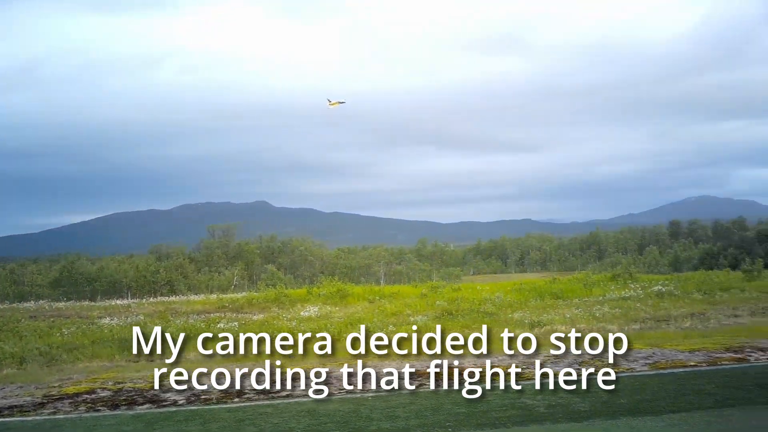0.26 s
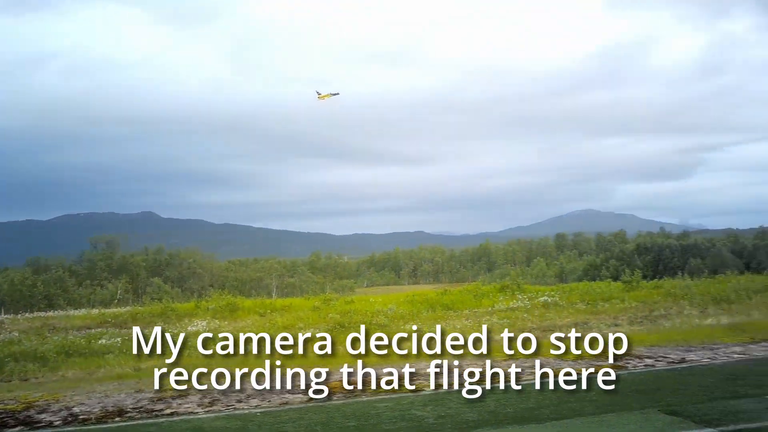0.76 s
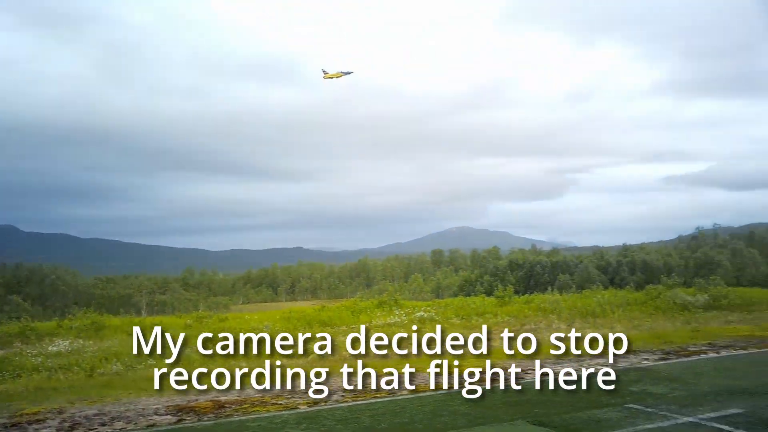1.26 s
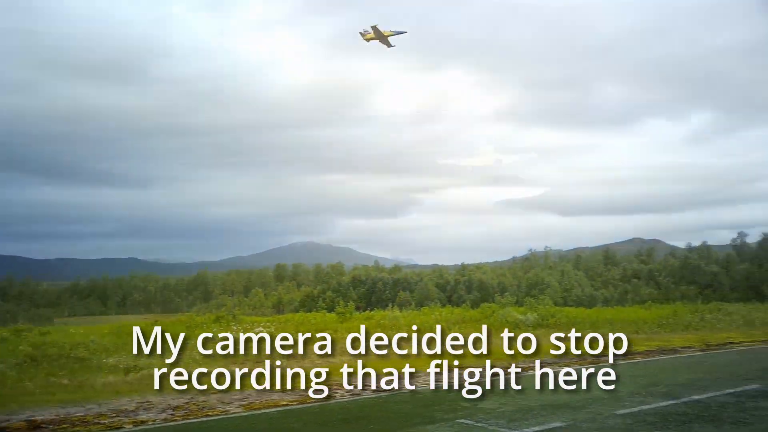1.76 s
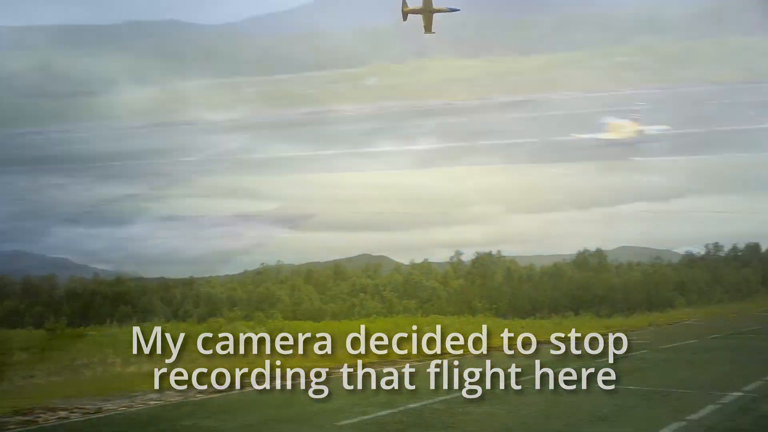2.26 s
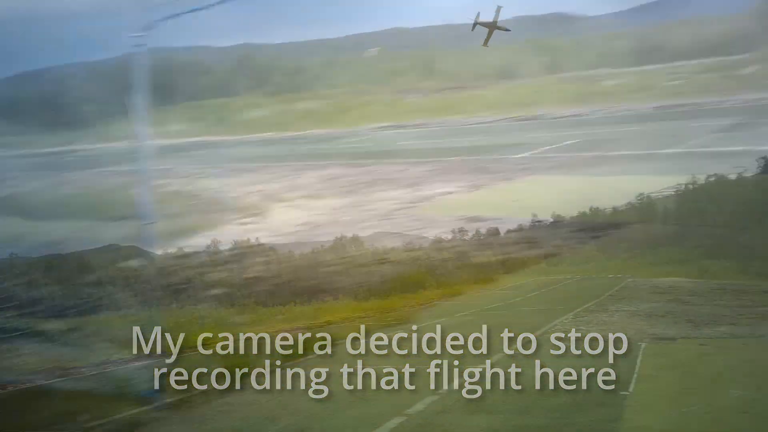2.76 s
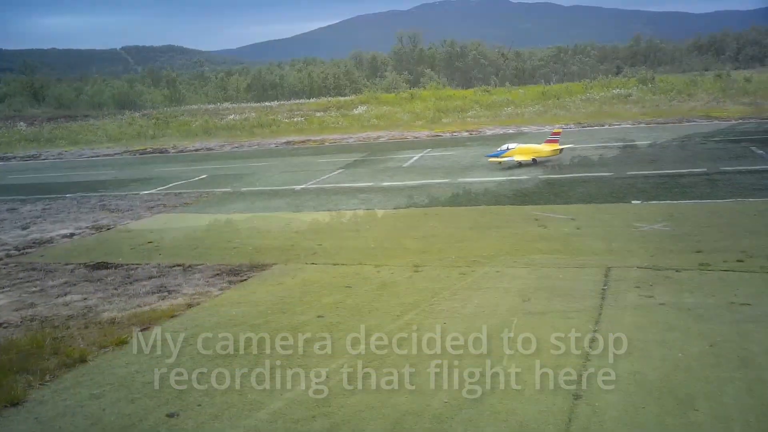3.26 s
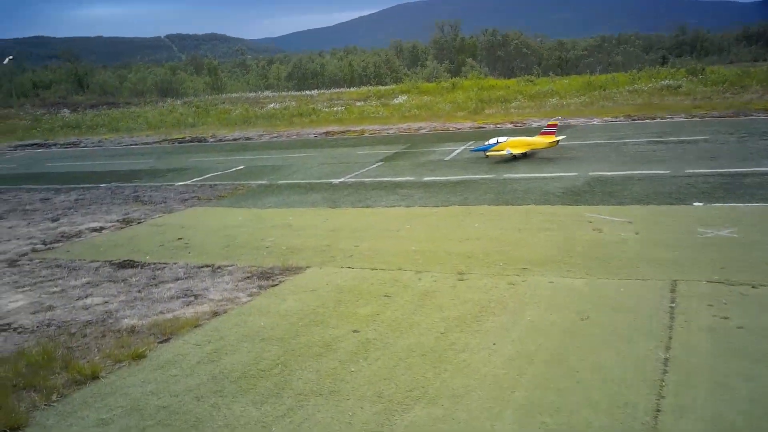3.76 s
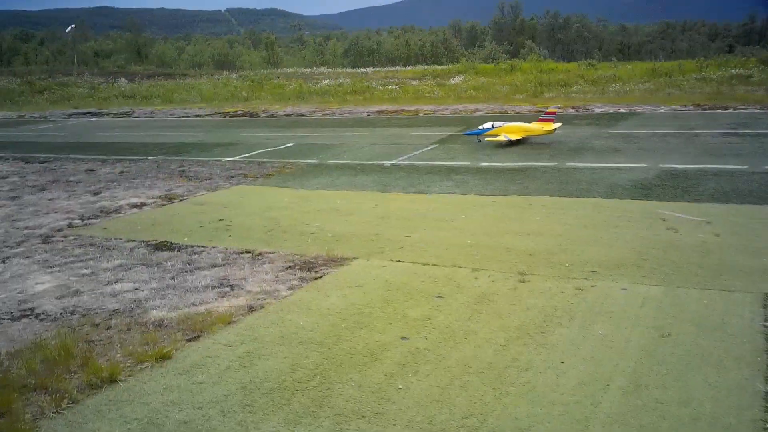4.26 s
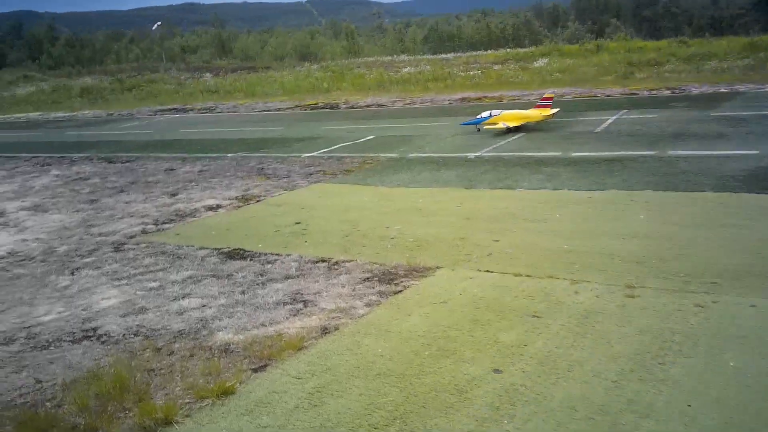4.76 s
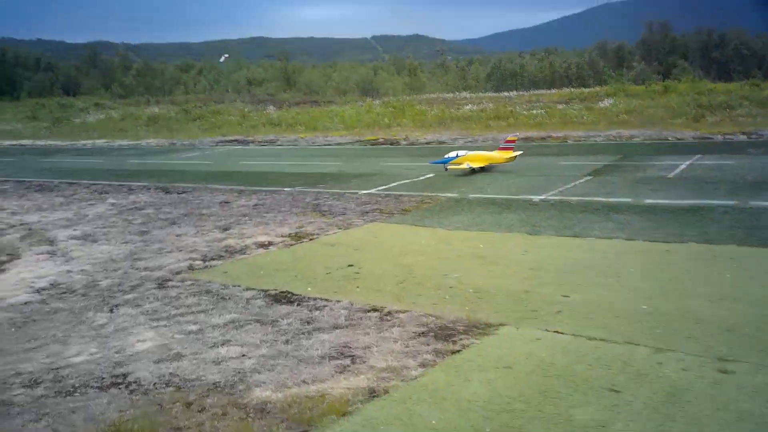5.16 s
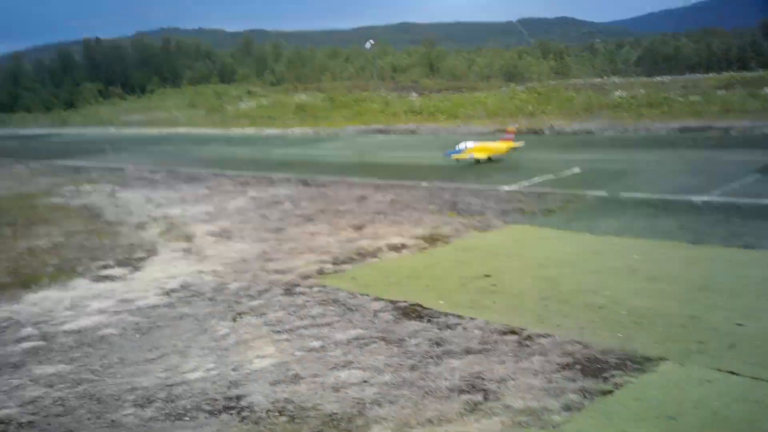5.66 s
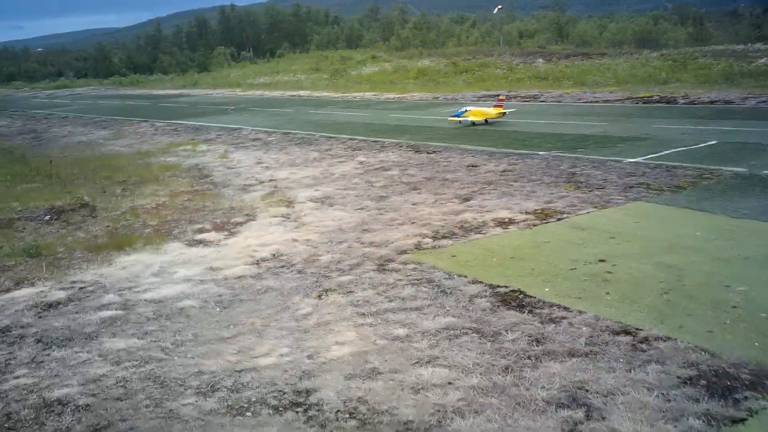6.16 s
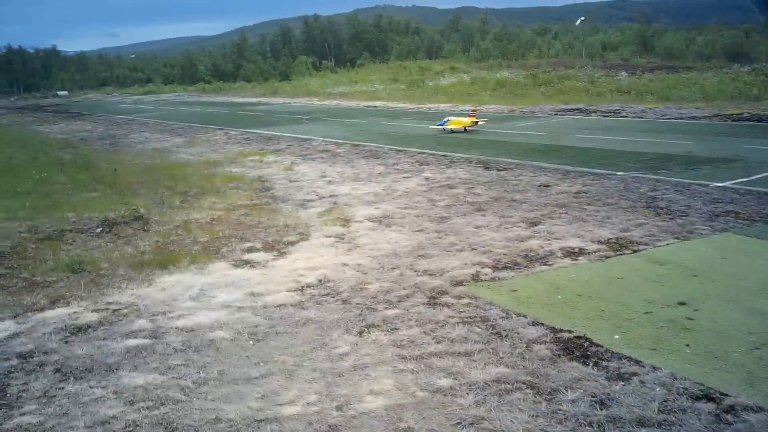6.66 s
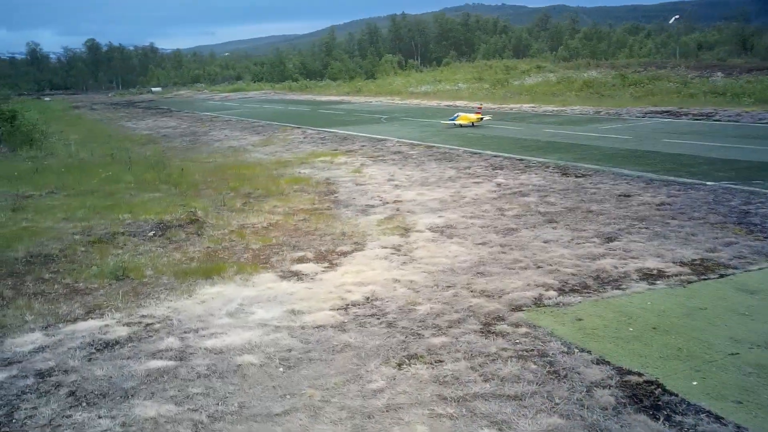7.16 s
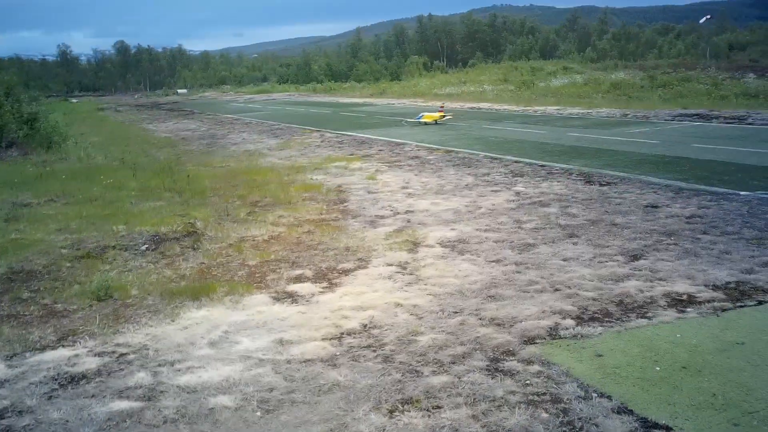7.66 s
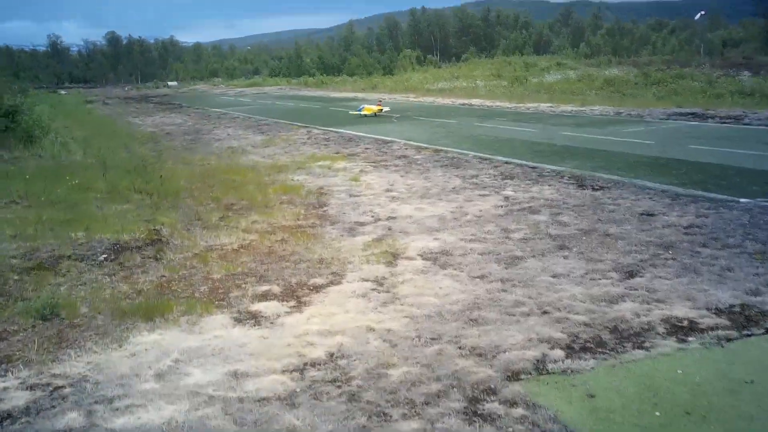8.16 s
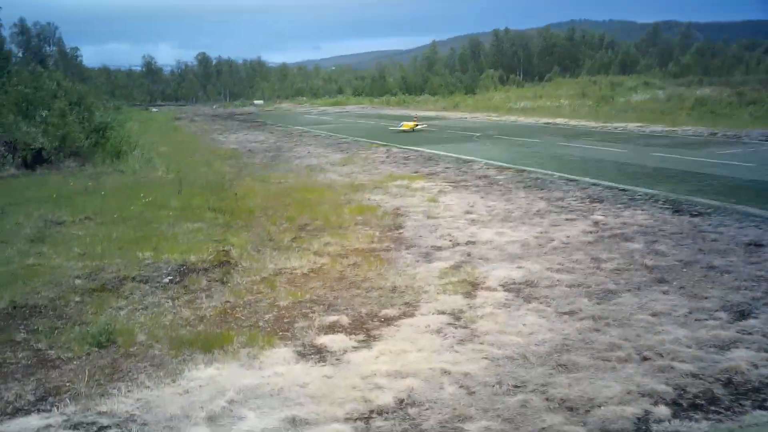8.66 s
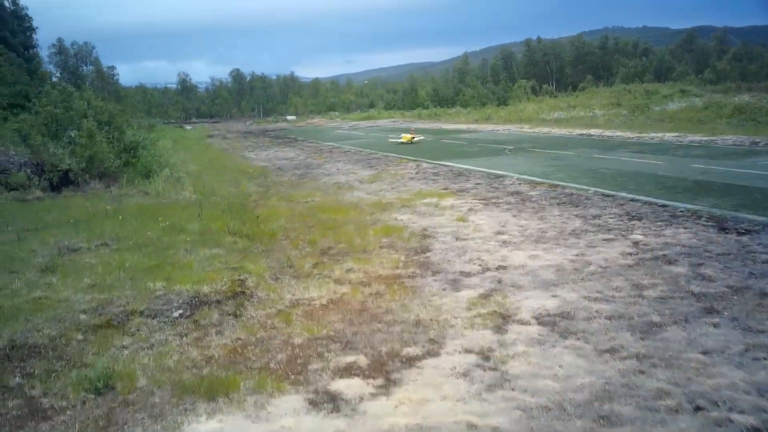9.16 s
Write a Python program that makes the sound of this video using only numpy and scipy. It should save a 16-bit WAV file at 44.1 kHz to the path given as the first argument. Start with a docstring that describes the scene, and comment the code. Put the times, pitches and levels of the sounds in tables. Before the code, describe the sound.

A small electric jet whines and rushes past overhead, then a second one's whine climbs to a shriek, drops in steps and fades amid buffeting wind.

```python
"""A fast whining rush flies by, then a second whine climbs, passes and sinks away on a gusty airstrip.
Both are electric ducted-fan model jets: tones at the blade rate sound over noise shaped like rushing air.
A ground echo combs the first jet's rush; the second changes colour as its tail turns to the microphone.
Wind noise, pressure pulses and buzzing flaps buffet the microphone; a bird ticks in two quick groups."""
import sys
import numpy as np
from scipy import signal
from scipy.fft import rfft, irfft, next_fast_len
from scipy.io import wavfile
from scipy.ndimage import uniform_filter1d, map_coordinates

SR = 44100
rng = np.random.default_rng(int(sys.argv[2]) if len(sys.argv) > 2 else 0)


def persist_wave(psi):
    """Save psi, clipped to +-1, as 16-bit WAV."""
    counts = np.round(np.clip(psi, -1, 1) * 32767).astype(np.int16)
    wavfile.write(sys.argv[1], SR, np.atleast_2d(counts).T)


N = 414981
TIME = np.arange(N) / SR  # seconds
BLADE_ORDER = 18  # blade rate divided by the rotor's turn rate
CRUISE_HZ = 3700  # blade rate at which the taxiing jet's levels are given
HISS_TOP_HZ, TOP_HZ = 10050, 15500  # top of the noises; top of the whole sound

# Fan of the flying jet. Each row: time in seconds, blade rate in Hz.
FLY_SPEED = [(0, 4850), (.38, 4855), (.49, 4386), (.69, 4440), (.82, 4180), (1, 4045), (1.32, 4094),
             (1.57, 4386), (1.86, 4483), (2.28, 4395), (2.45, 4426), (2.72, 4335), (2.86, 4070), (3, 4004),
             (3.17, 4175), (3.52, 4470)]
# The flying jet's pass, swelling and fading in the moving air.
# Each row: time in seconds, airflow in dB and whine in dB, both before a small trim.
FLY_PASS = [(0, -63, -57.5), (.22, -58, -53.5), (.32, -52.5, -49.5), (.55, -61, -67), (.8, -62.5, -60),
            (1.2, -60, -63), (1.38, -55, -58), (1.46, -52.5, -41), (1.62, -52.5, -54), (1.76, -53.5, -45.5),
            (1.85, -45, -38), (1.94, -45.5, -51), (2.02, -47, -38), (2.11, -45.5, -40), (2.19, -47.5, -49),
            (2.5, -42.5, -37.5), (2.7, -45.5, -35), (3, -49, -45), (3.18, -55, -53.5), (3.32, -62, -64),
            (3.52, -93, -78)]
# Overtones of its whine. Each row: level overhead in dB before the whine's trim,
# share of the airflow's fading that it follows.
FLY_OVERTONES = [(-54, 0.73), (-59, 1.7)]
# Its once-a-turn rotor hum. Each row: time in seconds, level in dB before the whine's trim.
FLY_HUM = [(1.2, -72), (1.65, -55.5), (2.25, -57), (2.7, -80), (3.5, -65)]
# Colour of its airflow. Each row: frequency in Hz, level in dB.
FLY_COLOUR = [(100, -1), (300, -5.5), (800, -0.5), (1500, -4.5), (2600, -7.5), (3700, 0), (4800, 0.5),
              (6200, -3.5), (7500, -6.5), (9700, -11)]
# Its ground echo, latest when it is overhead. Each row: time in seconds, lag in steps of 1.1 ms.
GROUND_LAG = [(0, 2.3), (.6, 2.35), (1.2, 2.97), (1.6, 3.12), (2, 3.82), (2.35, 4.23), (2.7, 4.08),
              (3, 3.36), (3.5, 2.2)]
# A brief dip in its level. Each row: time in seconds, level in dB.
FLY_DIP = [(3.055, -1), (3.068, -14), (3.085, -18), (3.1, 0)]
FLY_NEAR_DB = -44.5  # airflow level overhead, before the trim
# low roar overhead in dB; share of the fading with distance that it follows
FLY_ROAR_DB, FLY_ROAR_SHARE = -50, 0.71
GROUND_TURN = 0.79  # phase turn of the echo, radians
GROUND_GAIN = 0.65  # share of the filtered airflow that the ground returns

# Fan of the taxiing jet, stepped by the throttle. Each row: time in seconds, blade rate in Hz.
TAXI_SPEED = [(2.15, 2605), (2.52, 2654), (2.75, 2412), (2.99, 2370), (3.1, 2290), (3.33, 2332),
              (3.47, 2615), (3.55, 2675), (3.71, 2736), (3.79, 2970), (3.877, 3064), (4.16, 4267),
              (4.47, 5454), (4.84, 6497), (5, 6520), (5.32, 6503), (5.6, 5548), (6.11, 3646), (6.33, 3848),
              (6.51, 3763), (6.78, 3744), (6.945, 3093), (7, 3060), (7.63, 3073), (7.76, 3057),
              (8.15, 3030), (8.25, 2980), (8.42, 2968), (8.53, 2740), (8.635, 2687), (8.74, 2460),
              (8.815, 2433), (8.89, 2203), (9, 2186), (9.12, 2243), (9.41, 2265)]
# How strongly it reaches the microphone as it nears, turns and rolls off.
# Each row: time in seconds, level in dB.
TAXI_REACH = [(2.9, -21), (3.3, -16), (3.6, -9), (3.87, -9.5), (4, -2), (4.5, -1.5), (5.15, .5),
              (5.55, 1.5), (6.1, 0.5), (6.75, -0.5), (7.1, -1), (7.92, -3.5), (8.2, -15), (8.3, -3.5),
              (8.46, -3.5), (8.57, -12), (8.78, -16.5), (9, -19.5), (9.41, -22)]
# How far its tail has turned to the microphone. Each row: time in seconds, share from 0 to 1.
TAIL_ON = [(3.2, 0.05), (4.1, 0.42), (4.5, 0.04), (5.55, 0.08), (6.1, 0.87)]
# Its airflow from low to high: exhaust roar, duct rush, blade hiss, top hiss.
# Each row: level at the cruising blade rate in dB, rise in dB per octave of fan speed, gain tail-on in dB.
TAXI_BANDS = [(-46, 10, -5), (-42.5, 12, -5), (-41, 15, 1), (-47, 16, -2.5)]
# How its duct rush rises and falls as it passes. Each row: time in seconds, level in dB.
TAXI_MIDS = [(3.5, 3), (3.8, 1), (4.1, 2.5), (5, 0.5), (5.3, -4), (5.9, -0.5), (6.3, 0), (7.9, -1.5),
             (9, -0.5)]
# How its top hiss and, less strongly, its overtones rise and fall.
# Each row: time in seconds, level of the top hiss in dB.
TAXI_TREBLE = [(3.6, 2), (4.1, 0), (4.5, 1), (5.9, 2), (6.8, -2.5), (7.15, -4), (7.5, -1.5), (8.2, 4),
               (8.5, 0), (9, 5)]
# Airflow colour heard from the side. Each row: frequency in Hz, level in dB.
SIDE_COLOUR = [(100, -35), (270, -5.5), (440, -2), (600, -8), (830, -6.5), (1050, -16), (1700, -8.5),
               (2700, -4), (3300, -5), (4200, -6.5), (5300, -7.5), (6400, -6.5), (6800, 2), (9700, -3.5)]
# Airflow colour heard from behind. Each row: frequency in Hz, level in dB.
TAIL_COLOUR = [(100, -9.5), (480, -4.5), (640, -11), (1200, -17.5), (1800, -12), (2300, -9), (3400, -1),
               (4100, -6.5), (4800, -6.5), (6350, -3.5), (6800, -11), (7700, -6), (8700, -11), (9700, -15)]
# How well a blade tone gets out sideways. Each row: frequency in Hz, level in dB.
SIDE_PASS = [(2200, 3), (2750, 5.5), (3050, -14), (3700, 12), (4600, -3.5), (5300, 3), (5800, 2.5),
             (6200, -3), (6550, -2.5), (8000, 6), (9700, -2)]
# How well a blade tone gets out through the tail pipe. Each row: frequency in Hz, level in dB.
TAIL_PASS = [(2200, -12), (2700, -7), (3050, 7), (3400, -3), (3750, 2), (4500, 5), (5900, 9), (6200, 2.5),
             (7400, -9.5), (9700, -11.5)]
# Second and third harmonic of the whine, side-on: level of each in dB against the first.
OVERTONE_DB = [-11, -26.5]
# The rotor's once-a-turn hum shakes the airframe, most near full speed.
# Each row: turn rate in Hz, level in dB.
HUM_RESPONSE = [(165, -72), (210, -47.5), (305, -50.5), (350, -38), (365, -38)]
# Duct resonance beamed at the microphone; it rises and swells as the jet passes.
# Each row: time in seconds, frequency in Hz, level in dB against the blade hiss.
DUCT_LOBE = [(4.2, 3500, -8), (4.7, 3822, -2.5), (5, 3923, -3.5), (5.2, 4400, 2), (5.6, 4273, -4.5),
             (6.3, 4670, -6), (7.5, 4970, -8), (8.5, 5160, -8)]
# A brief rising tone. Each row: time in seconds, frequency in Hz, level in dB.
SQUEAL = [(8.89, 2300, -90), (8.95, 2310, -69), (8.99, 2370, -66), (9.02, 2360, -80)]
# whine at the cruising blade rate in dB; its rise in dB per octave of fan speed
TAXI_WHINE_DB, WHINE_DB_PER_OCTAVE = -39, 14
OVERTONE_TAIL_DB, HUM_TAIL_DB = 11.5, -13  # tail-on, overtones grow and the hum weakens
# the whine comes and goes most when side-on: two spreads in dB, new random levels per second
SIDE_FADING_DB, TAIL_FADING_DB, FADING_HZ = 4.5, 0.56, 9

# Gusts on the microphone. Each row: start in seconds, length in seconds, level in dB,
# amount of flapping from 0 to 1.
GUSTS = [(0.052, 0.044, -55.5, 0.11), (0.138, .11, -56, 0), (.262, .11, -39, 0.9), (.398, 0.057, -49, 0.94),
         (0.572, .18, -58.5, 0.03), (0.894, .12, -53, 0), (1.025, .2, -48, 0), (1.249, .08, -44.5, 0.5),
         (1.352, 0.082, -49, 0.44), (1.434, 0.023, -45, 0.37), (1.504, 0.092, -44.5, 0.04),
         (1.915, .23, -59.5, 0.01), (2.268, 0.067, -53, 0.17), (2.33, .1, -44, 0.85),
         (2.543, 0.042, -48.5, 0.1), (2.652, 0.046, -54, 0), (2.91, 0.091, -46.5, 0),
         (3.057, 0.033, -51.5, 0.03), (3.264, 0.19, -56.5, 0.21), (3.56, 0.066, -45, 0),
         (3.665, 0.048, -51.5, 0), (4.412, .04, -42, 0), (4.5, 0.17, -49, 0.02), (4.97, 0.9, -56, 0),
         (5.55, 0.22, -46, 0.1), (5.88, .1, -38.5, 0.01), (6.025, 0.16, -44.5, 0.12),
         (6.26, 0.14, -43, 0.07), (6.52, .3, -50, 0.14), (6.85, 0.14, -41, 0), (7.23, 0.15, -46.5, 0),
         (7.455, 0.028, -50, 0.08), (8.623, 0.11, -56.5, 0.03), (8.9, 0.028, -56.5, 0),
         (9.347, 0.034, -50.5, 0.02)]
# Colour of the wind's rumble on the microphone. Each row: frequency in Hz, level in dB.
WIND_COLOUR = [(15, -12), (30, -14), (60, -1), (100, -5), (160, 0), (240, -8), (350, -11), (550, -17.5),
               (1200, -46.5), (4000, -74)]
# Single hard eddies. Each row: time in seconds, strength in dB.
THUMPS = [(1.147, -33), (1.562, -30), (2.563, -51), (2.942, -35), (3.588, -25), (4.426, -30.5), (5.93, -35),
          (6.946, -50), (7.357, -35), (8.696, -41), (9.364, -44)]
GUST_RISE_S, GUST_FALL_S = 0.0095, 0.022
BREEZE_DB = -66.5  # lowest wind level, between gusts
FLAP_HZ, FLAP_JITTER = 60.97, 0.131  # typical flaps per second; spread of their spacing
FLAP_THUMP_DB, THUMP_SCATTER_DB = -30.5, 3  # suction of a full flap, typical and spread
FLAP_CRACKLE_DB, CRACKLE_SCATTER_DB = -37.5, 1.6  # buzz of a full flap, typical and spread

# Bird ticks. Each row: start in seconds, length in seconds, pitch in Hz, peak level in dB.
TICKS = [(.364, .014, 6960, -48), (.382, 0.0062, 7050, -46), (.396, 0.0045, 7000, -53),
         (1.33, 0.0042, 7400, -50), (1.332, 0.013, 6980, -49), (1.349, .006, 6960, -46.5),
         (1.363, .006, 7000, -49)]
# Colour of the open field. Each row: frequency in Hz, level in dB.
FIELD_COLOUR = [(25, 6.5), (200, -30.5), (500, -8), (1000, -15.5), (3000, -12.5), (6000, -16),
                (10000, -21.5)]


def undb(db):
    """Turn decibels into gain."""
    return 10 ** (np.asarray(db) / 20)


def unit(x):
    """Scale a sound to rms 1."""
    return x / np.sqrt(np.mean(x ** 2))


def curves(table):
    """Draw each column of a timed table as a curve, sample by sample."""
    s, *columns = np.transpose(table)
    return [np.interp(TIME, s, column) for column in columns]


def response(table, hz):
    """Read the level in dB of a (Hz, dB) table at the given frequencies."""
    points_hz, db = np.transpose(table)
    return np.interp(np.log(hz), np.log(points_hz), db)


def sounding(table):
    """Stay at 1 while a table runs, with soft ends outside it."""
    outside_s = np.minimum(TIME - table[0][0], table[-1][0] - TIME)
    return np.clip(1 + outside_s / 0.15, 0, 1)


def walk(rate):
    """Wander smoothly between random points, this many per second, with rms 1."""
    steps = rng.standard_normal(8192)
    return unit(map_coordinates(steps, [TIME * rate], order=1, mode="wrap"))


def noise(colour, lo_hz=0, hi_hz=HISS_TOP_HZ):
    """Shape one band of random noise to the given colour, at rms 1."""
    size = next_fast_len(N)
    hz = np.maximum(np.fft.rfftfreq(size, 1 / SR), 1)
    in_band = (hz > lo_hz) * (hz <= hi_hz)
    gain = undb(response(colour, hz)) * in_band
    spectrum = rfft(rng.standard_normal(size)) * gain
    return unit(irfft(spectrum, size)[:N])


def band(x, lo_hz, hi_hz):
    """Keep the frequencies between two edges (second-order band-pass)."""
    return signal.sosfilt(signal.butter(2, [lo_hz, hi_hz], "band", fs=SR, output="sos"), x)


def ridge(centre_hz, width_hz):
    """Make noise in a resonance whose centre moves, by shifting slow noise up to it, at rms 1."""
    low_pass = signal.butter(3, width_hz / 2, fs=SR, output="sos")
    slow = signal.sosfilt(low_pass, rng.standard_normal((2, N)))
    phase = 2 * np.pi * np.cumsum(centre_hz) / SR
    return unit(slow[0] * np.cos(phase) + slow[1] * np.sin(phase))


def fan(speed, harmonics_db, hum_db, top_hz, waver, flutter_db):
    """Blade harmonics, each fluttering in the moving air, over the once-a-turn hum of the rotor."""
    steady_hz = uniform_filter1d(curves(speed)[0], size=900)
    hz = steady_hz * (1 + waver * walk(45))
    phase = 2 * np.pi * np.cumsum(hz) / SR
    out = undb(hum_db + 0.67 * walk(12)) * np.sin(phase / BLADE_ORDER)
    for k, db in enumerate(harmonics_db, 1):
        audible = np.clip((top_hz - k * hz) / 100, 0, 1)  # fades out just below the top
        out += audible * undb(db + flutter_db * walk(50)) * np.sin(k * phase)
    return np.sqrt(2) * out * sounding(speed)


def flying_jet():
    """Blade whine over rushing air; the delayed ground echo adds to the airflow and combs it."""
    hiss_db, whine_db = curves(FLY_PASS)
    fade_db = hiss_db - FLY_NEAR_DB
    overtones_db = [db + share * fade_db + 3.8 * walk(12) for db, share in FLY_OVERTONES]
    harmonics_db = [whine_db, *overtones_db]
    whine = fan(FLY_SPEED, harmonics_db, curves(FLY_HUM)[0], TOP_HZ, waver=0.00043, flutter_db=2.5)

    split_hz = 2500
    roar = undb(FLY_ROAR_DB + FLY_ROAR_SHARE * fade_db) * noise(FLY_COLOUR, 0, split_hz)
    hiss = undb(hiss_db - 1.2) * noise(FLY_COLOUR, split_hz)
    air = roar + hiss

    # soft ground returns mostly the middle of the spectrum, and turns its phase
    middle = signal.hilbert(band(air, 170, 4700), next_fast_len(N))[:N]
    bounce = np.real(middle * np.exp(1j * GROUND_TURN))
    lag_s = curves(GROUND_LAG)[0] * 0.0011
    echo = np.interp(TIME - lag_s, TIME, bounce)
    rush = (air + GROUND_GAIN * echo) * undb(1.6 * walk(16))
    return undb(-1.5) * whine + sounding(FLY_SPEED) * rush


def taxi_state():
    """Give the blade rate, its octaves above cruising, reach in dB and how far the tail has turned."""
    hz, = curves(TAXI_SPEED)
    octaves = np.log2(hz / CRUISE_HZ)
    return hz, octaves, curves(TAXI_REACH)[0], np.clip(curves(TAIL_ON)[0], 0, 1)


def taxi_whine():
    """The whine grows with fan speed; the duct favours whichever harmonic lies in its pass band."""
    hz, octaves, reach_db, tail = taxi_state()
    fading_db = (SIDE_FADING_DB * (1 - tail) + TAIL_FADING_DB * tail) * walk(FADING_HZ)
    whine_db = TAXI_WHINE_DB + WHINE_DB_PER_OCTAVE * octaves + reach_db + fading_db
    overtone_gain_db = OVERTONE_TAIL_DB * tail ** 3 + 0.69 * curves(TAXI_TREBLE)[0]
    overtones_db = [db + overtone_gain_db + 1.86 * walk(11) for db in OVERTONE_DB]
    harmonics_db = []
    for k, db in enumerate([0, *overtones_db], 1):
        duct_db = (1 - tail) * response(SIDE_PASS, k * hz) + tail * response(TAIL_PASS, k * hz)
        harmonics_db.append(whine_db + db + duct_db)
    hum_db = response(HUM_RESPONSE, hz / BLADE_ORDER) + reach_db + HUM_TAIL_DB * tail
    return fan(TAXI_SPEED, harmonics_db, hum_db, HISS_TOP_HZ, waver=0.00063, flutter_db=1.18)


def taxi_airflow():
    """Turbulence rings the duct, louder and brighter with fan speed; its colour turns with the tail pipe."""
    hz, octaves, reach_db, tail = taxi_state()
    levels = [db + rise_db * octaves + tail_db * tail + reach_db for db, rise_db, tail_db in TAXI_BANDS]
    levels[1] += curves(TAXI_MIDS)[0]
    levels[3] += curves(TAXI_TREBLE)[0]
    edges_hz = [0, 1300, 3200, 6500, HISS_TOP_HZ]
    out = np.zeros(N)
    for lo, hi, db in zip(edges_hz, edges_hz[1:], levels):
        side = np.sqrt(1 - tail) * noise(SIDE_COLOUR, lo, hi)
        astern = np.sqrt(tail) * noise(TAIL_COLOUR, lo, hi)
        out += (side + astern) * undb(db + 0.55 * walk(22) + 0.5 * walk(6))

    hiss_db = levels[2]
    lobe_hz, lobe_db = curves(DUCT_LOBE)
    lobe = ridge(lobe_hz, width_hz=700) * undb(hiss_db + lobe_db + 1.7 * walk(30))
    # blades chop eddies into a noisy skirt around the whine, strongest astern
    skirt = ridge(hz, width_hz=440) * undb(hiss_db - 11.0 + 4.4 * tail)
    return (out + lobe + skirt) * sounding(TAXI_REACH)


def squeal():
    """A faint, brief tone, a single sine that rises in pitch."""
    hz, db = curves(SQUEAL)
    tone = np.sin(2 * np.pi * np.cumsum(hz) / SR)
    return np.sqrt(2) * undb(db) * sounding(SQUEAL) * tone


def gust_strength():
    """Each gust rises, holds and dies away over a light breeze."""
    gain = np.full(N, undb(BREEZE_DB))
    for s, length, db, _ in GUSTS:
        outside = np.maximum((s - TIME) / GUST_RISE_S, (TIME - s - length) / GUST_FALL_S)
        gain = np.maximum(gain, undb(db) * np.exp(-np.clip(outside, 0, 20)))
    return gain


def wind():
    """Eddies of uneven size strike the microphone one by one, over a soft rumble."""
    count = 380
    where, size = rng.random(count), rng.standard_normal(count)
    spots = ((np.arange(count) + where) / count * (N - 1)).astype(int)
    eddies = np.zeros(N)
    eddies[spots] = rng.choice([-1, 1], count) * undb(2.5 * size)
    lumps = unit(band(band(eddies, 14, 253), 28, 340))
    return unit(lumps + 0.5 * noise(WIND_COLOUR)) * gust_strength()


def flap_crackle():
    """The buzz of flapping air in the microphone's port: rough noise minus uneven, fast-dying spikes."""
    buzz_phase = np.cumsum(680 * np.exp(0.18 * walk(400))) / SR
    spikes = unit(band(np.exp(-(buzz_phase % 1) / 0.2), 380, 3500))
    colour = [(200, 3.0), (500, 5.0), (1000, -11), (2300, -17.0), (3000, -24.5), (7000, -40)]  # Hz, dB
    return unit(1.25 * noise(colour, 240) - band(spikes, 200, 2800))


def flaps():
    """Each flap is a short suction and a rebound; flapping gusts give quick, uneven runs that buzz."""
    suction, gate = np.zeros(N), np.zeros(N)
    lead_s = 0.004  # room for the pulse to begin before its set time
    age = np.arange(SR // 40) / SR - lead_s
    push = np.exp(-((age - 0.0015) / 0.0011) ** 2)
    push -= 0.55 * np.exp(-((age - 0.009) / 0.0013) ** 2)  # rebound
    # the buzz starts at once and dies within a few milliseconds
    burst = np.clip(age / 0.00034, 0, 1) * np.exp(-(age / 0.0079) ** 2)

    def span(s):
        """Samples that one pulse covers."""
        return int((s - lead_s) * SR) + np.arange(len(age))

    for s, db in THUMPS:
        suction[span(s)] -= undb(db) * push
    chances = rng.standard_normal(size=(len(GUSTS), 32, 3))
    for (start, length, _, flapping), chance in zip(GUSTS, chances):
        s = start
        for gap, thump, crackle in chance:
            if flapping > 0 and s < start + length:
                thump_db = FLAP_THUMP_DB + THUMP_SCATTER_DB * thump
                crackle_db = FLAP_CRACKLE_DB + CRACKLE_SCATTER_DB * crackle
                suction[span(s)] -= flapping * undb(thump_db) * push
                gate[span(s)] += flapping * undb(crackle_db) * burst
            s += np.exp(FLAP_JITTER * gap) / FLAP_HZ
    return suction + gate * flap_crackle()


def bird():
    """Tiny near-pure ticks in two quick groups, each a short sine with soft ends."""
    out = np.zeros(N)
    for s, length, hz, db in TICKS:
        age = np.arange(int(length * SR)) / SR
        tick = signal.windows.tukey(len(age), 0.5) * np.sin(2 * np.pi * hz * age)
        out[int(s * SR) + np.arange(len(age))] += undb(db) * tick
    return out


def field():
    """Faint breeze over grass and trees: coloured noise that wanders gently in level."""
    return noise(FIELD_COLOUR) * undb(-63.5 + walk(3.6))


def scene():
    """All sounds are added into one mono signal; the flying jet's level dips briefly once."""
    jets = flying_jet() * undb(curves(FLY_DIP)[0]) + taxi_whine() + taxi_airflow()
    mono = jets + squeal() + wind() + flaps() + bird() + field()
    return np.array([mono, mono])


def record(dry):
    """Cut the top of the treble away steeply."""
    return signal.sosfilt(signal.ellip(12, 0.1, 80, TOP_HZ, fs=SR, output="sos"), dry)


dry = scene()
out = record(dry)
persist_wave(out)
```